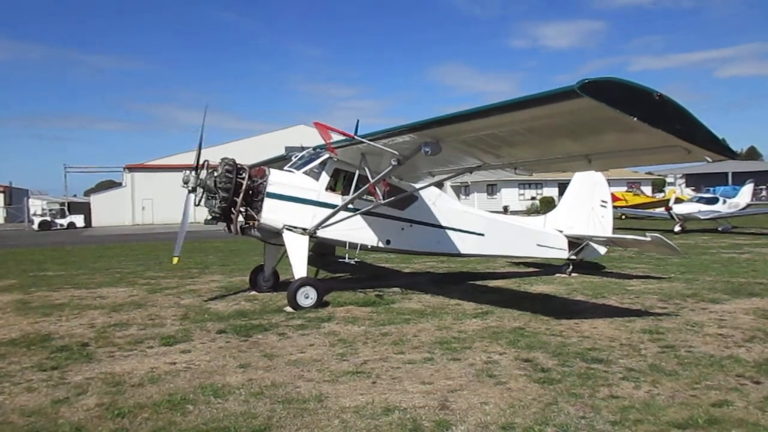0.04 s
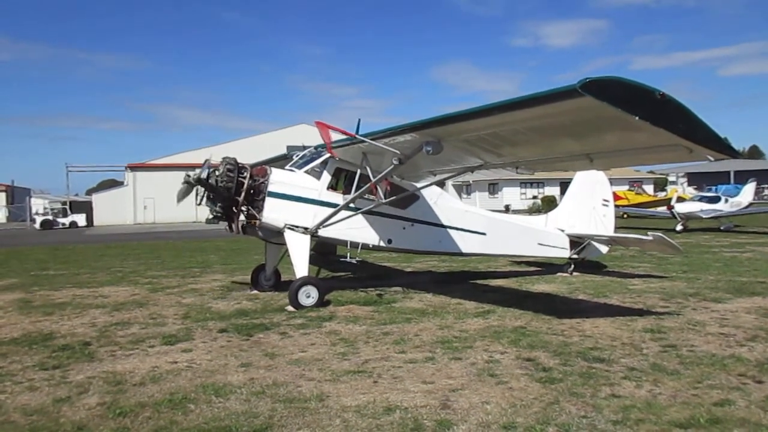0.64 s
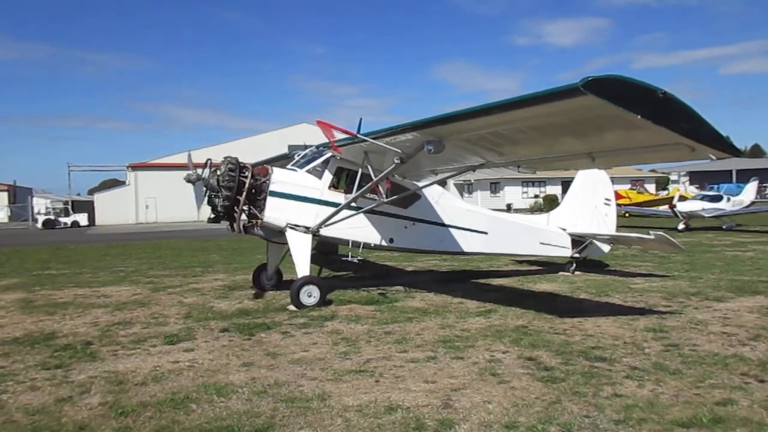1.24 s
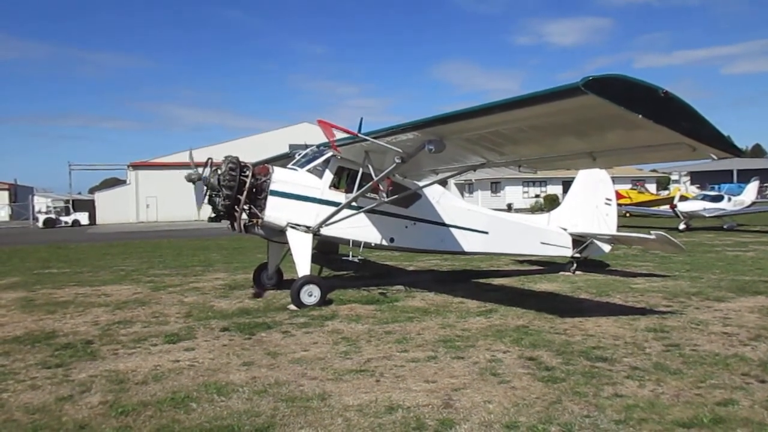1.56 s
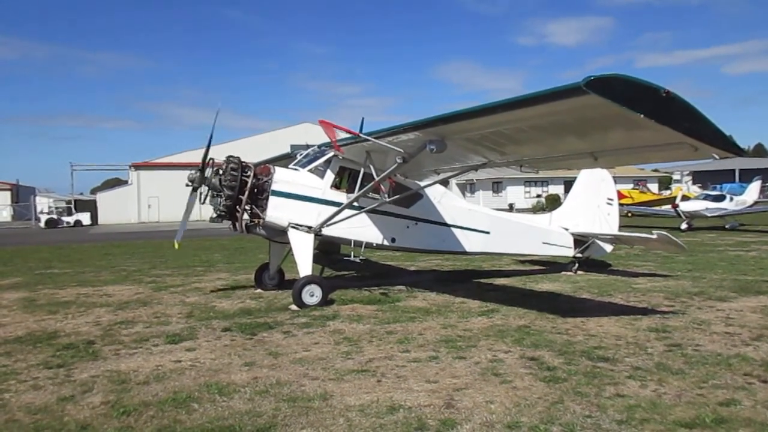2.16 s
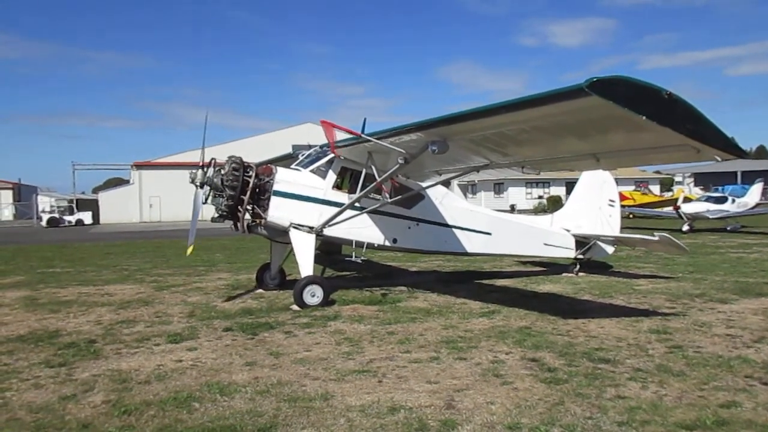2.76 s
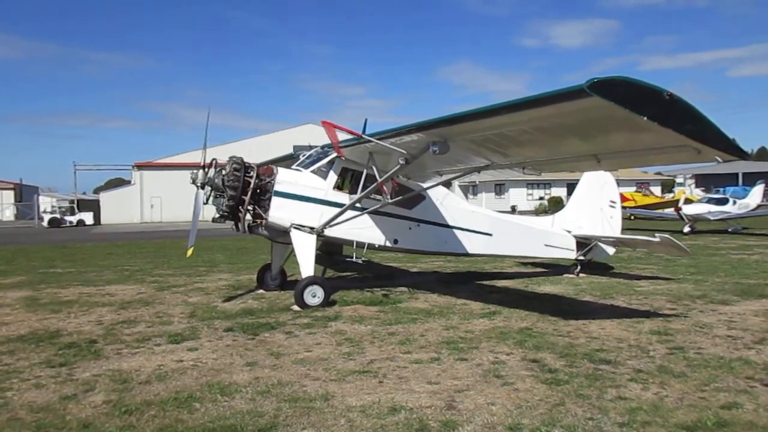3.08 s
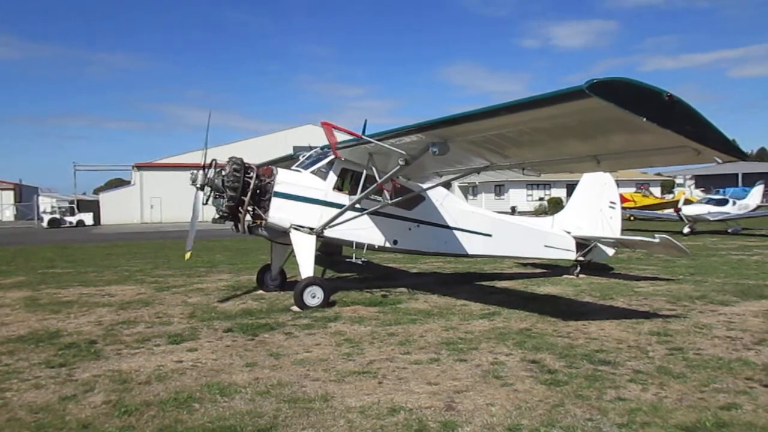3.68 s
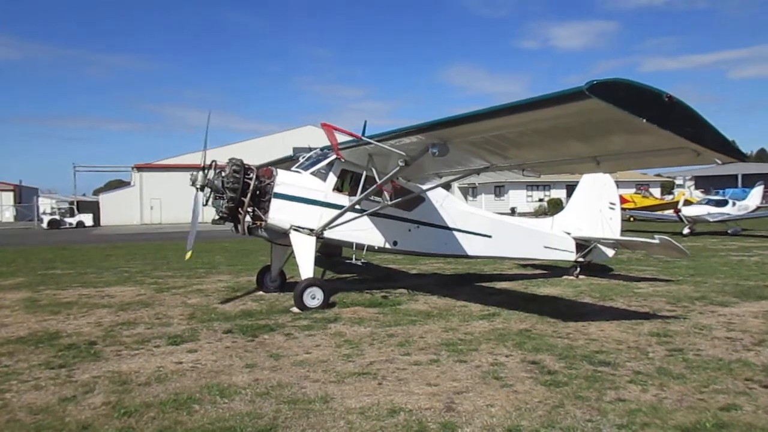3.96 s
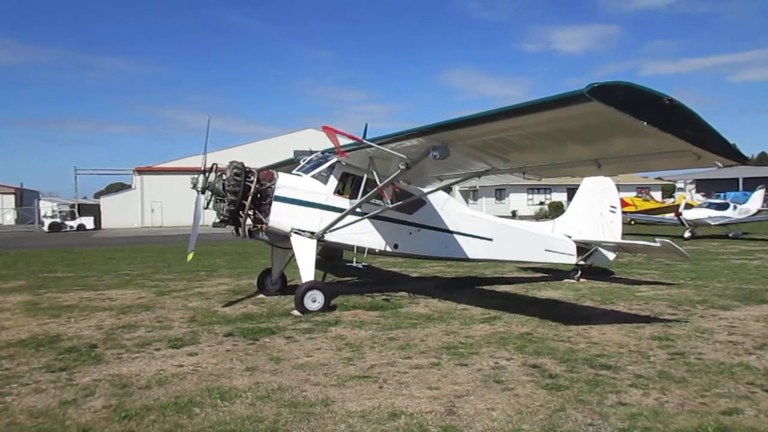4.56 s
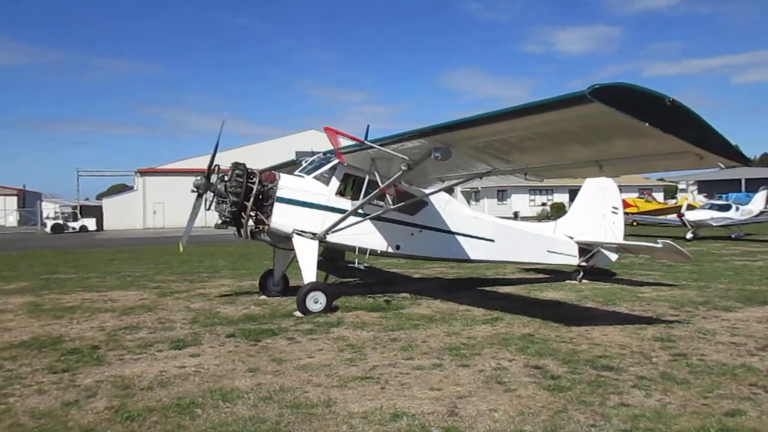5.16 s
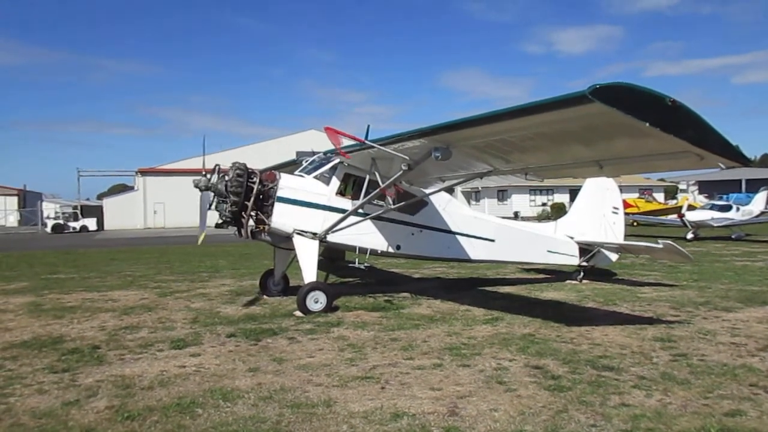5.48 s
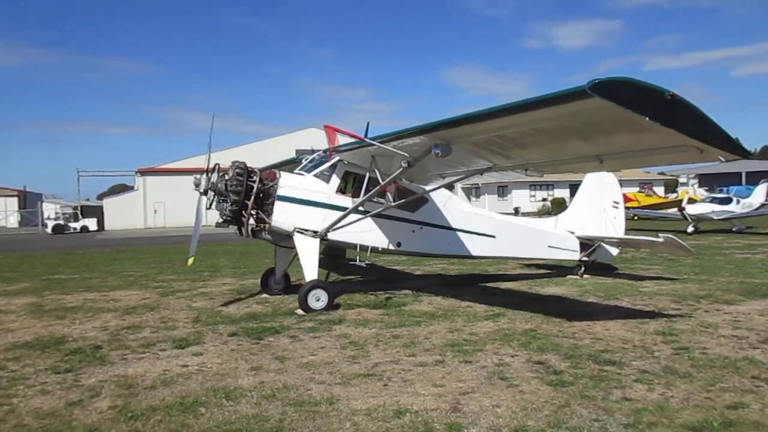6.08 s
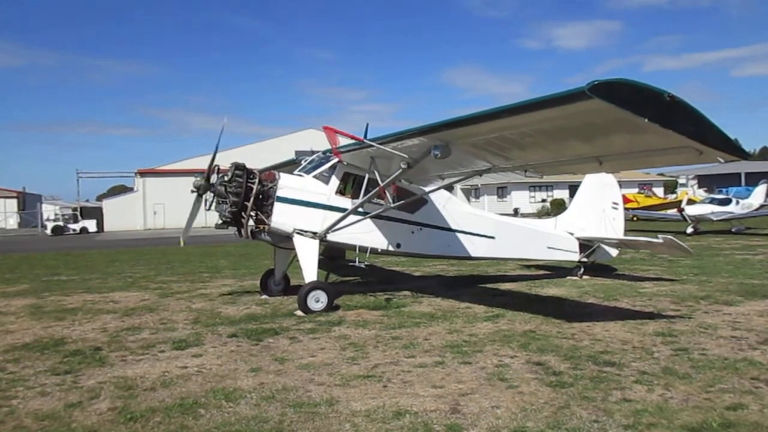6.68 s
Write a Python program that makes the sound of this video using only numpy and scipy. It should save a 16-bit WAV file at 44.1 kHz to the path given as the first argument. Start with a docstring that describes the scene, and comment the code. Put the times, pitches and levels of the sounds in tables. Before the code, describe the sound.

A radial aircraft engine idles on a grass airfield, heard from a few metres to the side. Its fast, uneven chug carries a low rumble and raspy metallic exhaust, with scattered pops, coughs and spits. The speed gradually sags as a faint, very high whistle fades in. Midway the engine misfires and nearly dies, then picks up, spitting, and settles back to idle over a soft propeller wash.

```python
"""A nine-cylinder radial aircraft engine idles on a grass airfield, its uneven cylinders chugging.
Each firing sends a thump round the exhaust collector ring, a bark from its own stub and a rasp of gas
out of the pipe; single charges pop, cough or spit. A thin whistle fades in as the speed sags.
Between three and a half and four seconds the engine misfires and nearly dies. Then it picks up,
spitting, and is back at idle by five seconds, the whistle fading soon after."""
import sys
import numpy as np
from scipy import signal
from scipy.fft import rfft, irfft, next_fast_len
from scipy.io import wavfile
from scipy.ndimage import uniform_filter1d

SR = 44100
rng = np.random.default_rng(int(sys.argv[2]) if len(sys.argv) > 2 else 0)


def master_out(mix):
    """Clip the mix to full scale and print it as 16-bit PCM to the path in sys.argv[1]."""
    frames = np.transpose(np.atleast_2d(mix))
    ceiling = np.clip(frames, -1, 1)
    pcm = np.round(ceiling * 32767).astype(np.int16)
    wavfile.write(sys.argv[1], SR, pcm)


N = 305613
TIME = np.arange(N) / SR
IDLE_HZ = 84.3   # firings per second


def from_db(db):
    """Decibels to gain."""
    return 10 ** (np.asarray(db) / 20)


def rms_one(x):
    """Scale to unit rms."""
    return x / np.sqrt(np.mean(x ** 2) + 1e-20)


def evened(x, size=5200):
    """Ride the level to unit rms; the default window, about one engine cycle, keeps single firings."""
    power = uniform_filter1d(uniform_filter1d(x ** 2, size), size // 2)
    return x / np.sqrt(np.abs(power) + 1e-12)


def in_time(rows):
    """Breakpoint rows to one automation curve per column."""
    s, *columns = np.transpose(rows)
    return [np.interp(TIME, s, c) for c in columns]


def noise(spectrum):
    """Noise of a given colour that falls away beyond both ends of the table; rms 1."""
    hz, db = np.transpose(spectrum)
    size = next_fast_len(N, True)
    bins = np.maximum(np.fft.rfftfreq(size, 1 / SR), 1)
    ends = (np.minimum(bins / hz[0], 1) * np.minimum(hz[-1] / bins, 1)) ** 2
    gain = from_db(np.interp(np.log(bins), np.log(hz), db)) * ends
    return rms_one(irfft(gain * rfft(rng.standard_normal(size)))[:N])


def resonance(x, hz, width_hz):
    """Two-pole band-pass with gain 1 at its peak."""
    r = np.exp(-np.pi * width_hz / SR)
    poles = [1, -2 * r * np.cos(2 * np.pi * hz / SR), r * r]
    return signal.lfilter(np.array([1, 0, -1]) * (1 - r * r) / 2, poles, x + 1e-18)


def noise_band(hz, width_hz, size):
    """A pitched band of noise, its level evened over size samples."""
    band = resonance(rng.standard_normal(N), hz, width_hz)
    return evened(resonance(band, hz, width_hz), size)


def soften(x, hz):
    """One-pole low-pass."""
    r = np.exp(-2 * np.pi * hz / SR)
    return signal.lfilter([1 - r], [1, -r], x + 1e-18)


def clicks(times, sizes):
    """One click of the given size at each time."""
    inside = (times >= 0) & (times < TIME[-1])
    return np.bincount((times[inside] * SR).astype(int), sizes[inside], N)


def puffs(times, sizes, rise_s):
    """Envelopes that swell to their size in rise_s and die away."""
    age = np.arange(int(SR * .08)) / SR / rise_s
    return np.abs(signal.oaconvolve(clicks(times, sizes), age * np.exp(1 - age))[:N])


def uneven(times, spread_db):
    """A random gain for each firing: no two charges burn alike."""
    return from_db(spread_db * np.clip(rng.standard_normal(len(times)), -2, 2))


def by_chance(times, chance):
    """Pick firings at random, each with its own chance."""
    return times[rng.random(len(times)) < chance]


# The engine's sag and recovery. Each row: time in seconds, firings per second.
ENGINE_SPEED = [(0.0, 82.72), (0.3, 83.57), (1.4, 80.77), (2.2, 77.83), (2.6, 73.52), (3.0, 71.3),
                (3.3, 68.96), (3.5, 64.98), (3.7, 64.58), (3.9, 59.45), (4.1, 65.31), (4.5, 76.87),
                (4.7, 81.15), (5.0, 83.83), (5.8, 86.78), (6.6, 87.56), (6.93, 86.59)]
# The lope, in firing order. Each row: thump lateness and extra delay the long way round the ring, both
# in firing intervals, thump, rasp and bark accents in dB, bark pitch in Hz, valve pitch in Hz.
CYLINDER_VOICES = [(0.034, 0.68, 1, 2, -2, 668, 3100), (0.13, 0.404, -3.5, -0.5, 1, 732, 5680),
                   (0.076, 0.314, 0.5, -5, -9, 542, 4200), (-0.027, .34, -1.5, 0.5, -9.5, 546, 7000),
                   (0.0094, .2, -1.5, 0.5, -14, 558, 9000), (.079, 1.31, .5, 1, -8, 675, 4030),
                   (-0.17, 0.42, -8, -2.5, -6, 695, 2320), (-0.19, 0.434, 1, -3, -2, 740, 9450),
                   (-0.057, 0.084, -2, 0.5, -3.5, 564, 2760)]


def firings():
    """The engine's beat: its firing rate curve, then the time and cylinder of every firing."""
    rate, = in_time(ENGINE_SPEED)
    turned = np.cumsum(rate) / SR
    number = np.arange(int(turned[-1]) + 1)
    return rate, np.interp(number, turned, TIME), number % len(CYLINDER_VOICES)


def thumps(rate, times, detour_s, sizes, long_way_gain, soft_hz):
    """Each pulse reaches the outlet both ways round the collector ring and swings about once."""
    # The valves stay open for a fixed crank angle, so the swing stretches as the engine slows.
    crank = np.cumsum(rate / max(85.3, rate.mean())) / SR
    short_way = clicks(np.interp(times, TIME, crank), sizes)
    long_way = clicks(np.interp(times + detour_s, TIME, crank), sizes)
    swing = resonance(short_way + long_way_gain * long_way, hz=103.2, width_hz=81)
    swing = soften(soften(swing, soft_hz), soft_hz)
    return -evened(np.interp(crank, TIME, swing))


def firing_note(rate, share, share_per_hz):
    """A clean note at the firing rate takes over at low speed and dips at the weak cylinders."""
    weak_place, weak_half_width = 7.1, 1.5   # firings
    turned = np.cumsum(rate) / SR
    place = turned % len(CYLINDER_VOICES)
    dip = 1 - .84 * np.exp(-((place - weak_place) / weak_half_width) ** 2)
    level = share + share_per_hz * np.maximum(IDLE_HZ - rate, 0)
    return level * dip * -np.sin(2 * np.pi * turned)


# The dark bed under the thumps. Each row: frequency in Hz, relative noise density in dB.
RUMBLE_COLOUR = [(15, -24), (30, 0), (45, -13), (70, 7.5), (110, -4), (200, 3), (260, -7), (310, -7),
                 (400, -14.5), (600, -9.5), (900, -19.5), (1500, -33)]


def rumble():
    """The exhaust flow rumbles between the beats."""
    return evened(noise(RUMBLE_COLOUR))


def barks(times, cylinder, sizes, width_hz, rise_s, gas_db):
    """The opening valve and the gas behind it ring each cylinder's stub at its own pitch."""
    out, gas = 0, from_db(gas_db) * rng.standard_normal(N)
    for k, (*_, hz, _) in enumerate(CYLINDER_VOICES):
        at, size = times[cylinder == k], sizes[cylinder == k]
        push = clicks(at + rise_s, size) + gas * puffs(at, size, rise_s)
        out = out + resonance(push, hz, width_hz)
    return evened(signal.sosfilt(signal.butter(2, [450, 860], "band", fs=SR, output="sos"), out))


# The grit of gas leaving the pipe. Each row: frequency in Hz, relative noise density in dB.
RASP_COLOUR = [(400, -8.5), (800, -8.5), (1100, -2.5), (1450, -9), (2000, -8), (2500, -3.5), (3200, -11.5),
               (4700, -8), (6000, -10), (8800, -14.5), (12000, -16), (15800, -24)]
# The pipe's metallic ring. Each row: pitch in Hz, width in Hz, gain in dB.
PIPE_MODES = [(1200, 250, -1.5), (1697, 113, 7), (1814, 76, 10), (2246, 200, 4), (2877, 64, 7),
              (3008, 100, -9.5), (3417, 204, 5), (3836, 83, 2), (4350, 82, 0.5), (4690, 170, 0),
              (5390, 47, -4), (6410, 105, -1.5), (7500, 230, -2.5), (8550, 390, 2), (9600, 250, -2.5),
              (11460, 200, -29)]


def pipe_rasp(times, sizes, steady, spread_db, rise_s=.0032):
    """Turbulent bursts over a duller steady flow; each burst rings the pipe's modes in its own blend."""
    gas = noise(RASP_COLOUR)
    flow = steady * soften(noise(RASP_COLOUR), hz=3060)
    out = gas * puffs(times, sizes, rise_s) + flow
    for hz, width_hz, db in PIPE_MODES:
        bursts = gas * puffs(times, sizes * uneven(times, spread_db), rise_s)
        out = out + from_db(db) * resonance(bursts + flow, hz, width_hz)
    return out


def valves(times, cylinder, sizes, width_hz, rise_s):
    """Each valve zings briefly at a pitch of its own as it opens."""
    out, gas = 0, rng.standard_normal(N)
    for k, (*_, hz) in enumerate(CYLINDER_VOICES):
        opening = puffs(times[cylinder == k], sizes[cylinder == k], rise_s)
        out = out + resonance(gas * opening, hz, width_hz)
    return evened(out)


# The sizzle at the height of a burst. Each row: frequency in Hz, relative noise density in dB.
JET_COLOUR = [(2500, 4.5), (4700, -0.5), (7000, -8), (9000, 1.5), (11500, 0), (13500, -15), (15800, -19)]


def jet(times, sizes, rise_s):
    """Bright hiss that sounds only while a burst leaves the pipe."""
    return noise(JET_COLOUR) * puffs(times, sizes, rise_s)


def exhaust_gas(rate, times, cylinder, bursts, level):
    """Rasp, valve zing and jet hiss, brighter when the flow is strong or the engine labours below idle."""
    rasp = evened(pipe_rasp(times - .0018, bursts, steady=1, spread_db=6.5))
    zing = valves(times - .0012, cylinder, bursts * uneven(times, 4.5), width_hz=190, rise_s=.0017)
    hiss = evened(jet(times - .0015, bursts * uneven(times, 4.5), rise_s=.0032))
    bright = from_db(-13.5) * zing + from_db(-14.5) * hiss
    labour = from_db(.2069 * np.maximum(IDLE_HZ - rate, 0))
    force = labour * (level / level.mean()) ** .73
    return (rasp + bright * force) * level


# The soft air behind the engine. Each row: frequency in Hz, relative noise density in dB.
WASH_COLOUR = [(150, 2.5), (400, -13.5), (1000, -15.5), (2500, -20), (5000, -28.5), (9000, -37),
               (15000, -48)]


def wash(level_db):
    """The steady wash of the propeller and the open field."""
    return from_db(level_db) * noise(WASH_COLOUR)


def airfield(x, echo_db, dull_hz):
    """Add faint dull echoes from the wing, the fuselage and the hangars."""
    lags = (np.array([.013, .029, .071, .19, .31]) * SR).astype(int)
    echoes = sum(np.pad(x, (lag, 0))[:N] / (k + 1) for k, lag in enumerate(lags))
    return x + from_db(echo_db) * soften(echoes, dull_hz)


# Afterfire pops. Each row: start in seconds, relative thud and snap levels in dB.
AFTERFIRE_POPS = [(.055, -3, -19), (.656, -9, -20), (1.151, -12, -31), (1.815, -11, -23), (2.465, -12, -21),
                  (3.396, -9, -17), (3.44, -4.5, -9), (6.093, -9, -29)]


def pops(thud_db, thud_hz, width_hz, snap_db, snap_hz):
    """Unburnt mixture goes off in the pipe: one blunt pressure spike with a snap at its front."""
    s, thuds, snaps = np.transpose(AFTERFIRE_POPS)
    thud = resonance(clicks(s, from_db(thuds + thud_db)), thud_hz, width_hz) * SR / (2 * np.pi * width_hz)
    snap = resonance(clicks(s, from_db(snaps + snap_db)), snap_hz, snap_hz) * SR / (2 * np.pi * snap_hz)
    return soften(thud, hz=500) + soften(snap, hz=1800)


# The heaviest slow-burning charges. Each row: start in seconds, relative peak level in dB.
HEAVY_COUGHS = [(.141, -24), (.314, -21), (1.233, -19), (1.619, -17.5), (1.741, -14.5), (2.467, -19),
                (2.699, -21), (3.265, -19), (5.204, -16), (5.315, -17), (5.903, -12.5)]


def coughs(times, chance, stray_db, trim_db):
    """A slow burn pushes a dull puff out of the pipe; lighter ones fall by chance among the heavy ones."""
    strays = [(s, stray_db) for s in by_chance(times, chance)]
    s, db = np.transpose(HEAVY_COUGHS + strays)
    gas = noise_band(hz=372, width_hz=205, size=600)
    return gas * puffs(s, from_db(db + trim_db), rise_s=.0036)


def stray_spits(times, interval, rasp_db, lit, crack_db, bark_db):
    """Cue rows for lesser spits, likeliest from raspy cylinders and below idle, if the charge lights."""
    chance = .021 + .0022 * np.maximum(IDLE_HZ - 1 / interval, 0)
    s = by_chance(times, chance * lit * from_db(rasp_db) ** 2)
    return np.column_stack([s, [crack_db, bark_db] + 2 * rng.standard_normal((len(s), 2))])


# Loud single spits and hard exhaust barks. Each row: start in seconds, relative crack and bark in dB.
SPITS_AND_BARKS = [(.417, -22, -14), (.5924, -18, -23), (.7663, -38, -13.5), (1.856, -22, -34),
                   (1.9334, -23, -12), (1.994, -20.5, -5), (2.0204, -20.5, -27), (2.252, -19, -22),
                   (2.398, -21, -23), (2.461, -28, -12.5), (2.7044, -34, -15), (2.9302, -18, -19),
                   (3.143, -20, -26), (3.196, -20.5, -28), (3.257, -37, -16), (3.297, -21, -22),
                   (3.3727, -16, -17), (3.4744, -27, -16), (3.553, -27, -21), (3.585, -20, -25),
                   (3.6024, -21.5, -21), (3.6457, -21.5, -21), (3.6794, -20, -24), (3.7074, -20.5, -17),
                   (3.755, -20.5, -12), (3.9012, -25, -14), (3.973, -21, -30), (4.019, -18, -22),
                   (4.0831, -25, -14), (4.097, -18, -25), (4.172, -16, -23), (4.2126, -16.5, -29),
                   (4.2273, -17, -19), (4.2852, -21.5, -30), (4.6896, -16.5, -33), (4.814, -16, -21),
                   (5.655, -17, -17), (6.0794, -18, -29)]


def spits_and_barks(strays, crack_db, jet_db, bark_db, clank_db):
    """Single hits, each its own blend of a crack that sets the pipe wall clanking and a stub's bark."""
    s, crack, bark = np.vstack([SPITS_AND_BARKS, strays]).T
    stub_hz = max(hz for *_, hz, _ in CYLINDER_VOICES)
    stub = noise_band(stub_hz, width_hz=91, size=400)
    wall = noise_band(hz=2867, width_hz=300, size=400)
    cracks = pipe_rasp(s, from_db(crack + crack_db), steady=0, spread_db=7.5)
    hiss = jet(s, from_db(crack + jet_db), rise_s=.0023)
    clanks = wall * puffs(s, from_db(crack + clank_db), rise_s=.0039)
    return cracks + hiss + clanks + stub * puffs(s, from_db(bark + bark_db), rise_s=.0046)


# Holes in the beat. Each row: start and end in seconds, thump loss in dB, gas loss in dB.
MISFIRE_SPELLS = [(0.486, .58, 4.5, 0.5), (1.83, 1.903, 3, -0.5), (2.498, 2.566, 7, 5),
                  (3.444, 3.759, 8, 9.5), (3.774, 3.891, 8, 15), (3.895, 3.98, 5.5, 5.5),
                  (3.967, 4.032, 10, 0.5), (4.257, 4.285, 11, 7.5)]


def misfires(edge_s):
    """Charges fail to light: ducking curves for thump and gas, in dB lost."""
    thump, gas = np.zeros((2, N))
    for start, end, thump_db, gas_db in MISFIRE_SPELLS:
        spell = (np.tanh((TIME - start) / edge_s) - np.tanh((TIME - end) / edge_s)) / 2
        thump, gas = thump + thump_db * spell, gas + gas_db * spell
    return thump, gas


def whistle(rate, level_db, idle_pitch_hz, waver_hz, flutter):
    """A thin, wavering whistle trails the speed, speaks best below idle and jumps down near a stall."""
    best_rate, stall_rate = 73.6, 64.2   # firings per second
    lag_s, start_s, fade_s, stall_drop_hz = .3, .6, 2.7, 470
    trailing = np.interp(TIME - lag_s, TIME, rate)
    stalling = soften(1. * (rate < stall_rate), hz=3)
    hz = idle_pitch_hz - 26 * (IDLE_HZ - trailing) - stall_drop_hz * stalling
    loss_db = ((np.maximum(trailing, stall_rate) - best_rate) / 3.5) ** 2 / 2
    level = from_db(level_db - loss_db) * np.clip((TIME - start_s) / fade_s, 0, 1)
    waver, swell = (rms_one(soften(soften(w, hz=90), hz=90)) for w in rng.standard_normal((2, N)))
    return level * (1 + flutter * swell) * np.sin(2 * np.pi * np.cumsum(hz + waver_hz * waver) / SR)


# How hard the engine works. Each row: time in seconds, then thump, rumble, bark and rasp faders in dB.
EFFORT_FADERS = [(0, -18.5, -22, -28.5, -30.5), (0.4, -17, -20.5, -28.5, -29.0),
                 (0.75, -18.5, -25.5, -30.5, -31.0), (1, -18.0, -24, -29, -31.0),
                 (1.25, -17, -19.5, -27, -28.5), (1.9, -15.5, -24, -27.5, -28.5),
                 (2.35, -15.5, -19, -28, -28), (2.8, -16.5, -20, -27.0, -28),
                 (3.4, -14.5, -22, -25.5, -28.5), (4.1, -16.5, -22.5, -27.0, -27.5),
                 (4.4, -16, -22.5, -28.0, -28), (4.75, -15.5, -21, -25.5, -26),
                 (5.05, -17.0, -20.5, -28, -27.5), (5.6, -16.0, -19, -24.5, -26.5),
                 (6.35, -16.5, -22.5, -26.5, -28), (6.93, -15.0, -21.5, -25.5, -26)]


def scene():
    """The engine heard from a few metres to its side."""
    rate, times, cylinder = firings()
    interval = 1 / np.interp(times, TIME, rate)
    late, detour, thump_db, rasp_db, bark_db = np.array(CYLINDER_VOICES)[cylinder, :5].T
    thump_loss, gas_loss = misfires(edge_s=.0087)
    losses = np.array([thump_loss, .38 * gas_loss, 1.5 * gas_loss, gas_loss])
    thump_level, rumble_level, bark_level, rasp_level = from_db(in_time(EFFORT_FADERS) - losses)
    burning = np.clip(from_db(-gas_loss), 0, 1) ** 2   # near 0 in the deepest misfires
    lit = np.interp(times, TIME, burning)
    ragged = .0088 + 30 * (interval - interval.min()) + .079 * (1 - lit)   # slow, starved firings scatter
    late = late + ragged * rng.standard_normal(len(times)) / 2
    charge = uneven(times, spread_db=1.9)

    chug = thumps(rate, times + late * interval, detour * interval, charge * from_db(thump_db),
                  long_way_gain=.61, soft_hz=116.5)
    chug = evened(chug + burning * firing_note(rate, share=.045, share_per_hz=.1))
    low = chug * thump_level * from_db(.42) + rumble() * rumble_level * from_db(-.3)

    bark = barks(times - .007024, cylinder, charge ** .4 * from_db(bark_db),
                 width_hz=47, rise_s=.003036, gas_db=-22)
    bursts = charge * from_db(rasp_db) * uneven(times, spread_db=1.1)
    gas = exhaust_gas(rate, times, cylinder, bursts, rasp_level)
    top = bark * bark_level * from_db(-1.8) + gas * from_db(-.87)
    strays = stray_spits(times, interval, rasp_db, lit, crack_db=-23.5, bark_db=-30)
    top += spits_and_barks(strays, crack_db=-14, jet_db=-9.5, bark_db=-8.5, clank_db=-12.5)
    top += pops(thud_db=5, thud_hz=129, width_hz=140, snap_db=2, snap_hz=520)
    top += coughs(times, chance=.09 * lit, stray_db=-24.5, trim_db=-3.5)

    air = wash(level_db=-35)
    air += whistle(rate, level_db=-47 - .55 * gas_loss, idle_pitch_hz=14380, waver_hz=65, flutter=.8)
    return (low + airfield(top, echo_db=-19.5, dull_hz=2500) + air)[None]


def record(dry):
    """The microphone has a narrow notch in the treble; the top is cut steeply at 15.6 kHz."""
    notched = dry - .96 * resonance(dry, hz=7710, width_hz=150)
    return signal.sosfilt(signal.ellip(12, .1, 90, 15600, fs=SR, output="sos"), notched)


dry = scene()
out = record(dry)
master_out(out)
```